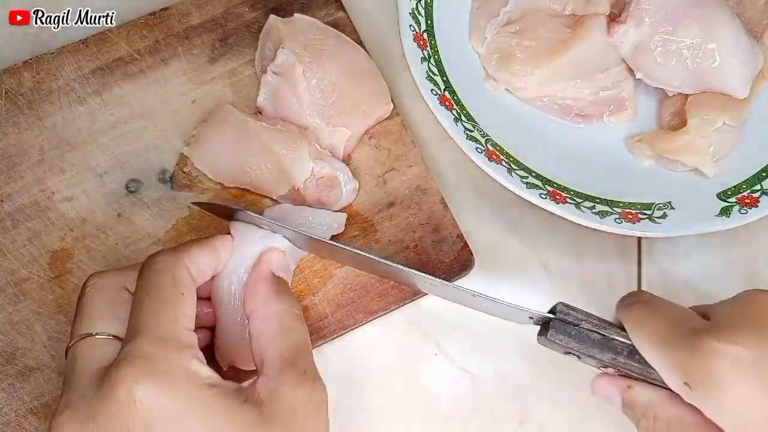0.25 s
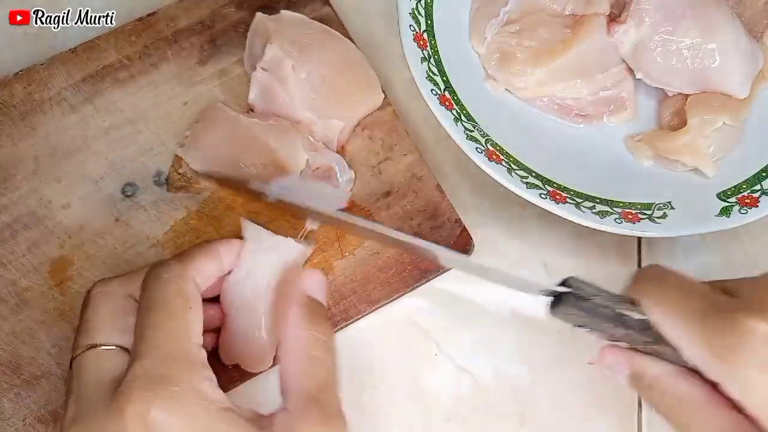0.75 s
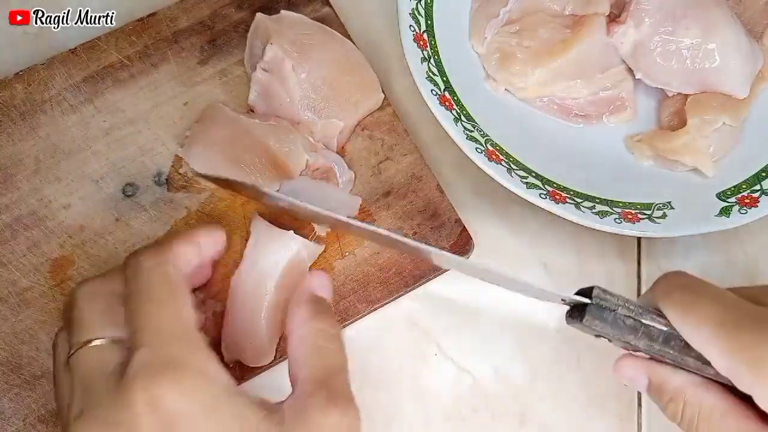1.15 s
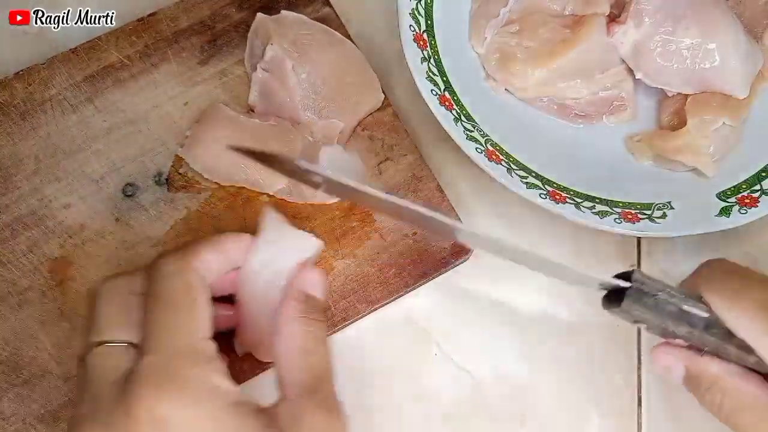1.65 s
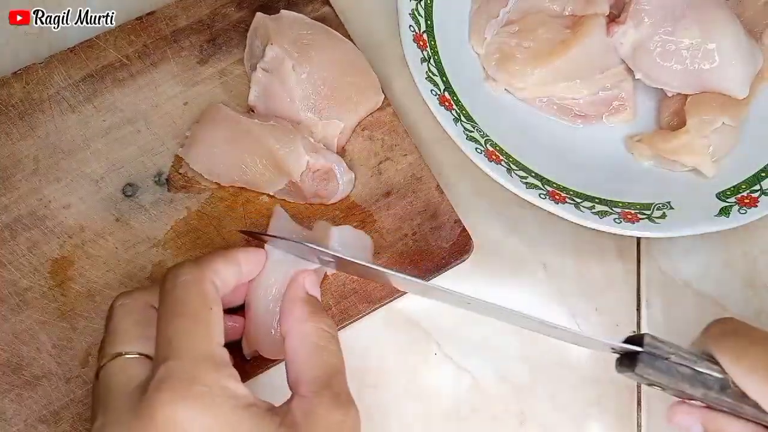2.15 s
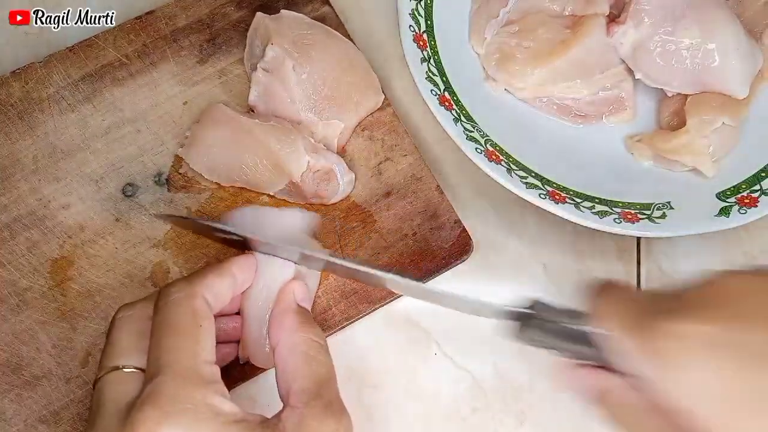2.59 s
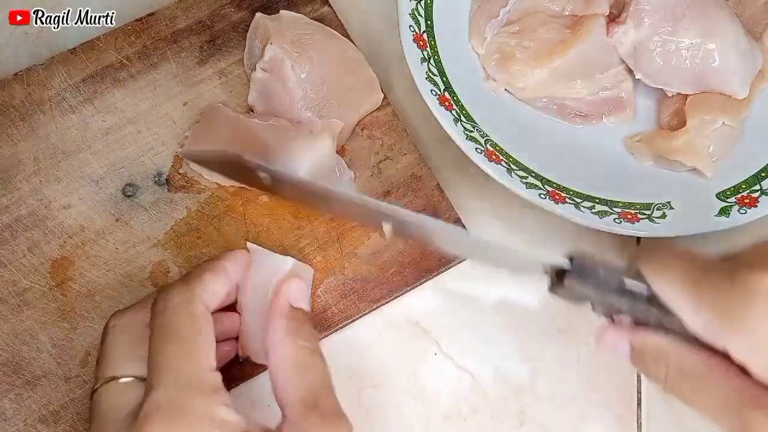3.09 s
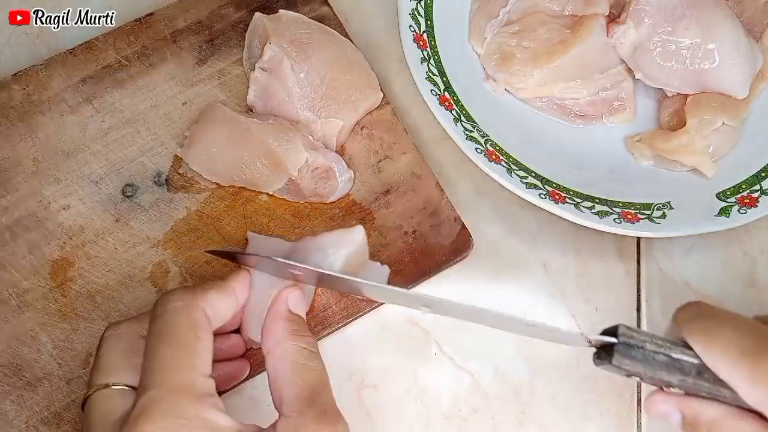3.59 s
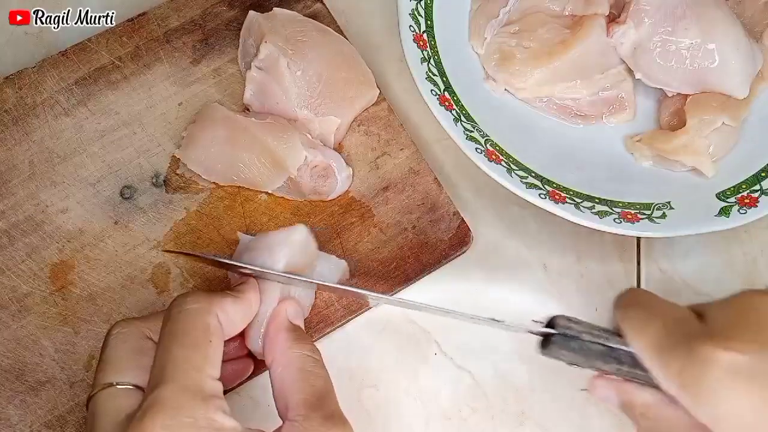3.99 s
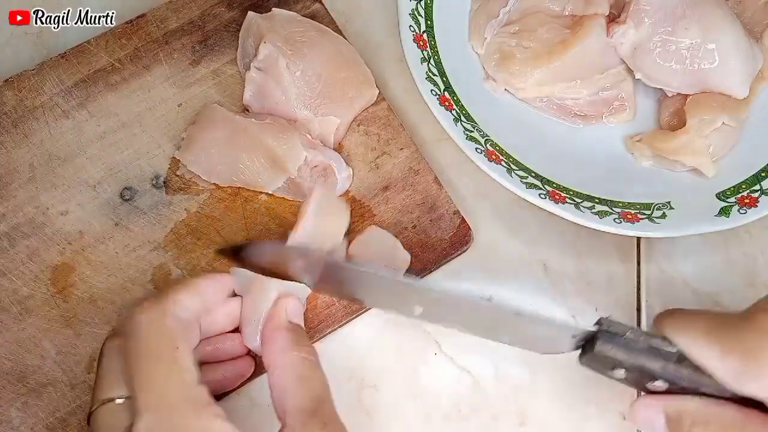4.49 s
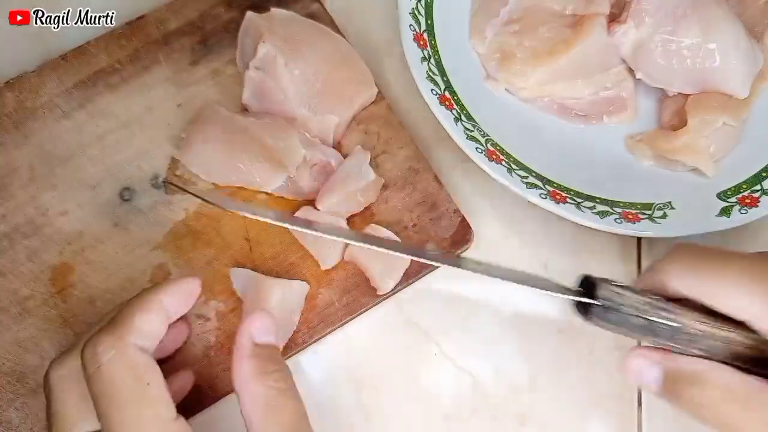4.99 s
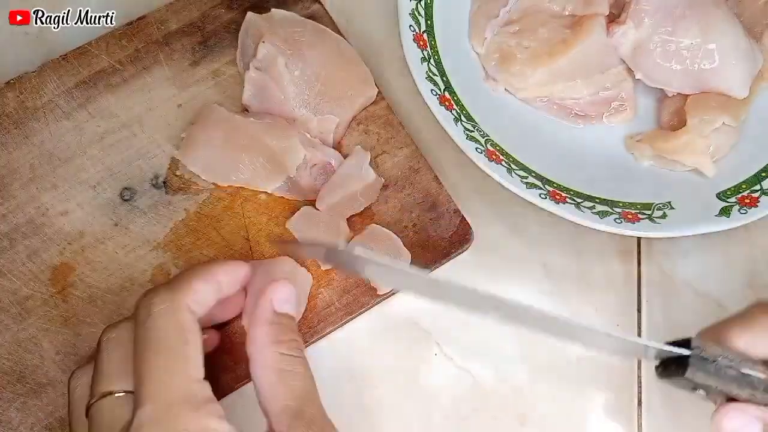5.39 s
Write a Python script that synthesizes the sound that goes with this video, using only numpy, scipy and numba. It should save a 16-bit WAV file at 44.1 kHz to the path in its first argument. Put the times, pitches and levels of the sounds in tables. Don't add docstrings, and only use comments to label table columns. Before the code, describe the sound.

A kitchen knife cuts raw chicken on a wooden board: faint wet rasps, one hard loud chop, and two longer soft scraping cuts.

```python
import sys
import numpy as np
from scipy import signal
from scipy.fft import rfft, irfft, next_fast_len
from scipy.io import wavfile
from scipy.ndimage import uniform_filter1d
from numba import njit

SR = 44100
rng = np.random.default_rng(int(sys.argv[2]) if len(sys.argv) > 2 else 0)


def invert_db(x):
    u = np.asarray(x, float) / 20
    return 10 ** u


def unload_audio(sound):
    columns = np.transpose(np.atleast_2d(sound))
    steps = np.round(np.clip(columns, -1, 1) * 32767)
    wavfile.write(sys.argv[1], SR, steps.astype(np.int16))


N = 249165
T = np.arange(N) / SR

# moment of full pressure in seconds, level in dB, seconds to swell 20 dB,
# seconds to fade 20 dB, wetness in dB.
STROKES = [(.04, -67, .12, .09, 3), (.1, -68, .05, .06, 6), (.17, -75, .04, .1, 6), (.27, -64, .06, .12, 3),
           (.335, -59, .09, .055, 1), (.48, -72, .08, .14, -10), (.615, -67, .04, .035, 8),
           (.67, -66, .11, .08, -12), (.735, -60.5, .07, .06, -1.5), (.89, -75, .05, .1, 4),
           (1.375, -70.5, .035, 0.21, -3), (1.45, -68, .06, .03, 4), (1.546, -79, .1, 0.05, 24),
           (3.15, -72, -0.02, .18, -1), (2.46, -75.5, .08, 0.2, 3), (2.785, -60, .12, .06, 3),
           (2.965, -45, .088, .12, 1), (3.049, -53, .08, .065, -1), (3.45, -77, .12, 0.0843, 3),
           (4.0, -81, .08, 0.16, 4), (4.21, -62, .11, .1, 1.5), (4.264, -49, .06, .03, -3.5),
           (4.415, -49, .065, .2, -5), (4.52, -50.5, .14, .13, 1)]
# frequency in Hz, level in dB per Hz.
DRAG_COLOUR = [(900, -31), (1060, -1.5), (1400, 3), (1560, -10.5), (1900, -7.5), (2120, -15.5), (2450, -9),
               (2800, -8), (3400, -9), (4150, -7.5), (4600, -16.5), (5300, -24), (6500, -34.5)]
# frequency in Hz, width in Hz, level in dB.
GRAIN_MODES = [(1100, 18, -4), (1474, 53, 4.5), (1690, 46, -5.5), (2455, 140, -1.5), (2700, 150, -7.5),
               (3340, 48, -13), (4097, 140, -12), (4950, 47, -13.5), (5760, 77, -25.5)]
# frequency in Hz, level in dB per Hz.
THRUM_COLOUR = [(110, -45.5), (180, -13.5), (220, -19.5), (285, -8), (372, -12.5), (563, -7.5),
                (689, -15.5), (1000, -22), (1300, -42), (2200, -120)]
# frequency in Hz, level in dB per Hz.
HISS_COLOUR = [(3240, -25), (5500, -6.5), (6430, -9), (7000, -2), (7290, -12.5), (8990, 4.5), (9280, -3.5),
               (10500, -13), (13000, -14), (14900, -6), (16000, -13.5)]
# dB at full pressure, dB per dB of pressure.
RING_LAW = (1.5, 1.27)
RASP_LAW = (-1, 1.038)
THRUM_LAW = (-11.5, .55)
WET_LAW = (-12.5, 0.98)
# start in seconds, length in seconds, frequency in Hz, width in Hz, level in dB.
SQUEAKS = [(0, 0.15, 3280, 500, -69), (0.236, 0.056, 2430, 300, -74), (0.312, 0.065, 2940, 400, -63.5),
           (0.612, .1, 1700, 150, -54.5), (0.726, 0.043, 3070, 250, -59.5), (0.732, 0.1, 1720, 150, -66),
           (1.391, 0.11, 2840, 280, -58.5), (0.915, 0.34, 920, 1030, -73), (2.501, 0.059, 3103, 300, -76),
           (2.555, 0.031, 3080, 300, -71.5), (2.68, 0.16, 3080, 500, -69), (4.146, .14, 3880, 900, -73.5),
           (4.488, 0.12, 575, 49.6, -54), (4.192, 0.09, 561, 80.5, -58), (4.822, 0.092, 3180, 350, -79),
           (3.8, 0.23, 1930, 60, -82), (5.151, 0.11, 3000, 300, -80.5), (.55, .13, 330, 300, -60),
           (2.735, .12, 560, 300, -61), (4.57, .08, 420, 150, -60), (3.39, .13, 4600, 1500, -81),
           (5.15, .12, 7000, 500, -93), (3.65, .1, 6800, 400, -94), (4.69, .05, 2000, 1500, -70)]
# start in seconds, peak in dB, contact time in ms, room level in dB.
KNOCKS = [
    (0.6349, -41.5, .25, -10.5),
    (1.4691, -5.5, 0.18, -6),
    (3.1573, -25.5, 0.21, -10),
    (4.669, -35.5, 0.1, -17),
]
# frequency in Hz, level in dB.
STRUCK_SPOTS = [(880, -7.5), (2499, 10.5), (885, -5.5), (5520, -6)]
# frequency in Hz, level in dB, seconds to die by 60 dB.
HEEL_MODES = [(410, 2, 0.063), (600, -7, 0.0078), (818, -5, 0.029), (1160, -2, .015), (1410, -2.5, .015)]
EDGE_MODES = [(160.4, -25, .3), (226, -15.5, 0.041), (363.7, -13, 0.054), (500, -11.5, .06),
              (759.6, -20, 0.067), (1116, -13, 0.035), (1450, -12, .04), (1700, -7, 0.028),
              (2070, -5.5, 0.03), (2275, -21, 0.052), (2373, -20, 0.12), (2470, 1, .05), (2663, -7, 0.021),
              (3140, -5.5, .035), (3456, -12, 0.035), (3780, -19, 0.034), (4500, -22.5, .03),
              (5212, -23.5, 0.035), (5940, -26.5, 0.034), (6600, -39.5, 0.0144), (8700, -39.5, .015)]
FLAT_MODES = [(275, -1, 0.11), (445, 2.5, 0.054), (628, 5.5, 0.047), (800, -5.5, 0.11), (1170, -3.5, 0.021),
              (1530, 3, 0.018), (1795, -3, 0.028), (2190, -9, 0.0194), (3000, -9, .012), (3650, -23, .01)]
TIP_MODES = [(177, 0.5, 0.1), (1480, 0.5, 0.054), (1780, -2, 0.022), (2100, 4.5, 0.024), (2470, 4.5, .015),
             (3000, -4, 0.011), (3620, 2, 0.022), (4000, 6.5, 0.012), (4420, -3, 0.023), (5507, -12, .015),
             (7100, -5, .015), (8900, -4.5, 0.015)]
# start in seconds, peak in dB.
STEEL_TICKS = [(.16, -62), (.245, -63), (1.648, -62), (.2008, -63), (.416, -68), (.5814, -63), (.604, -52),
               (.7715, -63), (1.076, -65), (1.4682, -43), (2.3325, -59), (2.369, -59), (2.4089, -66.5),
               (2.4343, -60.5), (2.4552, -68.5), (2.553, -63.5), (2.98, -40), (3.9405, -67),
               (3.9775, -67.5), (4.363, -66), (4.817, -66.5), (4.9236, -62), (4.987, -67), (5.4553, -60.5)]
# start in seconds, peak in dB.
FINGER_TICKS = [(0.6173, -55), (.6355, -57), (.8803, -64), (1.02, -54.5), (1.2215, -67), (1.4441, -55),
                (2.4844, -65.5), (2.5001, -58), (2.7931, -53), (2.82, -58), (3.1332, -51), (3.5058, -69),
                (3.6715, -57), (3.7119, -59), (3.8166, -65.5), (4.668, -58), (4.7734, -64), (4.8303, -48.5),
                (5.419, -60), (5.426, -60), (5.4424, -70), (5.4604, -57), (5.4746, -60), (5.476, -45),
                (5.5053, -41.5)]
# centre frequency in Hz, level of the lower part in dB.
STEEL_FILM = (8800, -14)
FINGER_FILM = (14100, -21)
# frequency in Hz, seconds to die by 60 dB.
WALL_DECAY = [(150, 0.9), (400, 0.28), (1200, 0.38), (2500, 0.57), (5000, 0.26), (10000, 0.12)]
# frequency in Hz, level in dB.
WALL_COLOUR = [(100, 5), (400, -2.5), (1000, 0), (2500, -1), (5000, -4), (9000, 10), (15000, 4)]
# time in seconds, frequency in Hz, level in dB.
MOTOR_GLIDE = [(0, 390, -67), (.1, 400, -54.5), (.2, 410, -68), (.4, 406, -66), (.6, 404, -85),
               (.95, 430, -72), (1.282, 407, -72.5), (1.4, 390, -90)]
# time in seconds, level in dB.
AIR_SWELL = [(0.0, -57), (0.14, -60), (0.41, -62), (0.63, -60), (1.32, -62), (1.64, -59), (1.82, -61),
             (1.97, -66), (2.47, -63), (3.49, -66), (3.7, -65), (3.98, -66), (4.44, -62), (4.8, -61),
             (5.13, -65), (5.65, -61)]
# frequency in Hz, level in dB per Hz.
FRIDGE_COLOUR = [(15, -67), (25, -33.5), (64, -11.5), (78, -6), (92, 0), (110, -2), (129, -12.5),
                 (156, -6.5), (168, -25), (230, -24), (300, -52), (510, -120)]
# frequency in Hz, level in dB per Hz.
MURMUR_COLOUR = [(100, -56.5), (170, -8), (253, 0), (361, -8.5), (409, -3.5), (522, -12.5), (609, -14),
                 (900, -14.5), (1170, -51), (1980, -120)]
# frequency in Hz, level in dB per Hz.
HUSH_COLOUR = [(350, -36.5), (600, -0.5), (717, -15.5), (779, -8.5), (1070, -4.5), (1660, -5), (1900, -8),
               (2070, -4.5), (4110, -14.5), (7110, -36.5), (8740, -25), (11200, -41), (14900, -30.5),
               (16000, -27)]

FULL_DB = -45
BEND = 1.6
STRIKE_T60_S = 0.019
FLUTTER_S, FLUTTER_DB = .0092, -4.5
MURMUR_DB, MURMUR_FOLLOWS = -68.5, .3
HUSH_DB = -73
TOP_HZ = 15800


def colour(x, points):
    hz, db = np.transpose(points)
    n = next_fast_len(len(x), True)
    f = np.maximum(np.arange(n // 2 + 1) * SR / n, 1)
    octaves_outside = np.maximum(np.log2(hz[0] / f), 0) + np.maximum(np.log2(f / hz[-1]), 0)
    gain = invert_db(np.interp(np.log(f), np.log(hz), db) - 60 * octaves_outside)
    return irfft(rfft(x, n) * gain, n)[:len(x)]


def unit(x):
    return x / np.sqrt(np.mean(x ** 2))


def walk(rate):
    k = int(SR / rate)
    steps = np.repeat(rng.standard_normal(N // k + 1), k)
    return 1.4 * uniform_filter1d(uniform_filter1d(steps, k), k)[:N]


def grit(scatter_db):
    size_db = scatter_db * np.minimum(rng.exponential(size=N), 6)
    return unit(rng.standard_normal(N) * invert_db(size_db))


@njit
def svf(x, hz, width):
    y, b, l, g, k, last = np.empty(len(x)), 0., 0., 0., 0., 0.
    for i in range(len(x)):
        if hz[i] != last:
            g, k, last = np.tan(np.pi * hz[i] / SR), width / hz[i], hz[i]
        v = (b + g * (x[i] - l)) / (1 + g * (g + k))
        b, l, y[i] = 2 * v - b, l + 2 * g * v, k * v
    return y


def strokes():
    s, peak_db, swell_s, fade_s, wet_db = np.array(STROKES).T[:, :, None]
    t = T[::128]
    slope_s = np.maximum(np.where(t < s, swell_s, fade_s), .005)
    press_db = peak_db - FULL_DB - 20 * (np.abs(t - s) / slope_s) ** BEND

    def follow(law, extra_db=0):
        level = invert_db(FULL_DB + law[0] + law[1] * press_db + extra_db)
        return np.interp(T, t, np.sqrt(np.sum(level ** 2, axis=0)))

    pressure = invert_db(1.5 * walk(110))
    slips = grit(3.4)
    rings = np.zeros(N)
    for hz, width, db in GRAIN_MODES:
        flare = invert_db(db + 3.8 * walk(30))
        rings += flare * unit(svf(slips, np.full(N, 1. * hz), 2.0 * width))
    drag = unit(colour(slips, DRAG_COLOUR)) + invert_db(-5.5) * unit(rings)
    ring = unit(colour(drag, [(200, 0), (1900, 0)]))
    rasp = unit(colour(drag, [(2000, 0), (16000, 0)]))
    thrum = unit(colour(grit(4.4), THRUM_COLOUR))
    hiss = unit(colour(grit(3.2), HISS_COLOUR) * invert_db(2.5 * walk(28)))
    scrape = follow(RING_LAW) * ring + follow(RASP_LAW) * rasp
    body = follow(THRUM_LAW, -.3 * wet_db) * thrum
    return pressure * (scrape + body + follow(WET_LAW, wet_db) * hiss)


def squeaks():
    out, slips = np.zeros(N), grit(3.5)
    for s, length, hz, width, db in SQUEAKS:
        i, n = int(s * SR), int(length * SR)
        centre = np.full(n, 1. * hz)
        rise = np.clip(T[:n] * hz / 9, 0, 1)
        fall = np.clip((length - T[:n]) / (0.5 * length), 0, 1)
        song = svf(svf(slips[i:i + n], centre, 1. * width), centre, 1.5 * width)
        out[i:i + n] += invert_db(db) * rise * fall * unit(song)
    return out


def ring_modes(modes, strike, t, last):
    out = last * strike
    for k, (hz, db, t60) in enumerate(modes):
        out = out + (-1) ** k * invert_db(db - 60 * t / (t60 * last)) * np.sin(2 * np.pi * hz * t)
    return out


def knocks():
    near, far, t = np.zeros(N), np.zeros(N), T[:SR // 3]
    thin = signal.butter(2, 170, "high", fs=SR, output="sos")
    parts = (HEEL_MODES, EDGE_MODES, FLAT_MODES, TIP_MODES)
    for (s, db, push_ms, room_db), (strike_hz, strike_db), modes in zip(KNOCKS, STRUCK_SPOTS, parts):
        push = np.sin(np.pi * np.clip(t[:128] * 1000 / push_ms, 0, 1)) ** 2
        strike = invert_db(strike_db - 60 * t / STRIKE_T60_S) * np.sin(2 * np.pi * strike_hz * t)
        ring = ring_modes(modes, strike, t, 1)
        crack = ring_modes(modes, strike, t, .22)
        ring = signal.sosfilt(thin, np.convolve(ring, push)[:len(t)])
        crack = signal.sosfilt(thin, np.convolve(crack, push)[:len(t)])
        size = invert_db(db) / np.max(np.abs(ring))
        i = int(s * SR)
        near[i:i + len(t)] += ring * size
        far[i:i + len(t)] += crack * size * invert_db(room_db + 11.5)
        for k in range(1, 4):
            j = i + int(k * FLUTTER_S * SR)
            near[j:j + len(t)] += crack * size * invert_db(k * FLUTTER_DB - 1.0)
    return near, far


def ticks():
    out, t = np.zeros(N), T[:2048]
    snap_s = T[30]
    rows = [tuple(row) + tuple(STEEL_FILM) for row in STEEL_TICKS]
    rows += [tuple(row) + tuple(FINGER_FILM) for row in FINGER_TICKS]
    chance = rng.standard_normal((len(rows), len(t)))
    for (s, db, hz, low_db), noise in zip(rows, chance):
        click = (t == snap_s) + 0.2 * noise * np.exp(-np.abs(t - snap_s) / .0003)
        bright = colour(click, [(8300, -5.5), (8900, -2), (10000, -7), (12000, -2), (15800, -0.5)])
        bright = bright + 3.0 * colour(click, [(.85 * hz, 0), (1.2 * hz, 0)])
        fizz = unit(colour(noise[::-1], [(8000, -6), (8900, 4), (10500, -6), (15800, -5.5)]))
        fizz = fizz * np.exp(-t / .007) * (t > snap_s)
        dull = svf(click, np.full(len(t), 3800.), 3000.)
        snap = (bright + invert_db(low_db) * 3 * dull) / np.max(np.abs(bright))
        i = int(s * SR)
        out[i:i + len(t)] += invert_db(db) * (snap + invert_db(-21) * fizz) * invert_db(2)
    return out


def room(x):
    t = T[:SR]
    tail = 0
    for hz, t60 in WALL_DECAY:
        band = svf(rng.standard_normal(SR), np.full(SR, 1. * hz), 1. * hz)
        tail = tail + band * invert_db(-60 * t / t60)
    build_up = np.clip((t - .003) / 0.0073, 0, 1)
    tail = colour(tail * build_up, WALL_COLOUR)
    return signal.fftconvolve(x, tail / np.sqrt(np.sum(tail ** 2)))[:N]


def motor():
    s, hz, db = np.transpose(MOTOR_GLIDE)
    centre = np.interp(T, s, hz)
    drone = svf(svf(rng.standard_normal(N), centre, 70.), centre, 70.)
    return unit(drone) * invert_db(np.interp(T, s, db, right=-140))


def air():
    swell_db = np.interp(T, *np.transpose(AIR_SWELL))
    fridge = unit(colour(rng.standard_normal(N), FRIDGE_COLOUR)) * invert_db(swell_db + 3.8 + 1.5 * walk(19))
    murmur_db = MURMUR_DB + MURMUR_FOLLOWS * (swell_db - np.mean(swell_db))
    murmur = unit(colour(rng.standard_normal(N), MURMUR_COLOUR)) * invert_db(murmur_db + 1.1 * walk(6.0))
    hush_db = HUSH_DB + 0.27 * walk(8.1) + 2.2 * np.exp(-(T / .9) ** 4)
    hush = unit(colour(rng.standard_normal(N), HUSH_COLOUR)) * invert_db(hush_db)
    return fridge + murmur + hush


def scene():
    near, far = knocks()
    close, snaps = strokes() + squeaks(), ticks()
    echo = room(far + invert_db(-11.5) * close + invert_db(-19) * snaps)
    return (near + close + snaps + echo + air() + motor())[None]


def band_limit(x):
    return signal.sosfilt(signal.butter(12, 16450, fs=SR, output="sos"), x)


def record(dry):
    top_cut = signal.ellip(6, .2, 22, TOP_HZ, fs=SR, output="sos")
    mix = signal.sosfilt(top_cut, dry)
    return band_limit(mix)


dry = scene()
out = record(dry)
unload_audio(out)
```